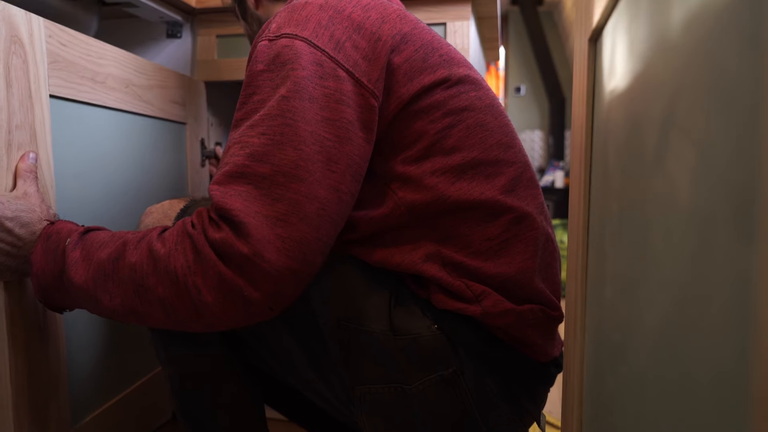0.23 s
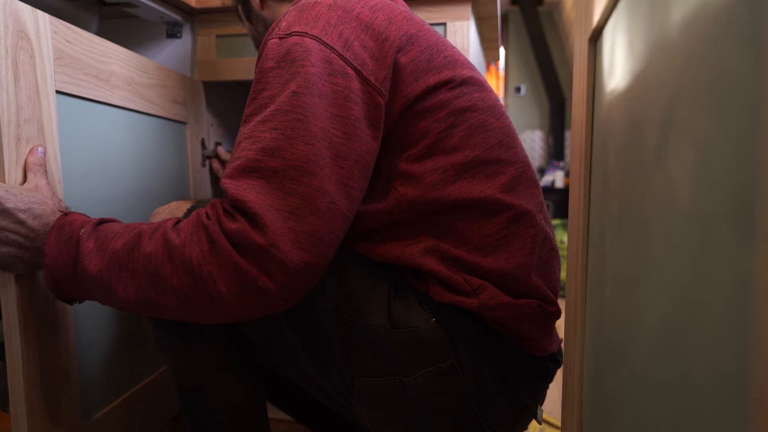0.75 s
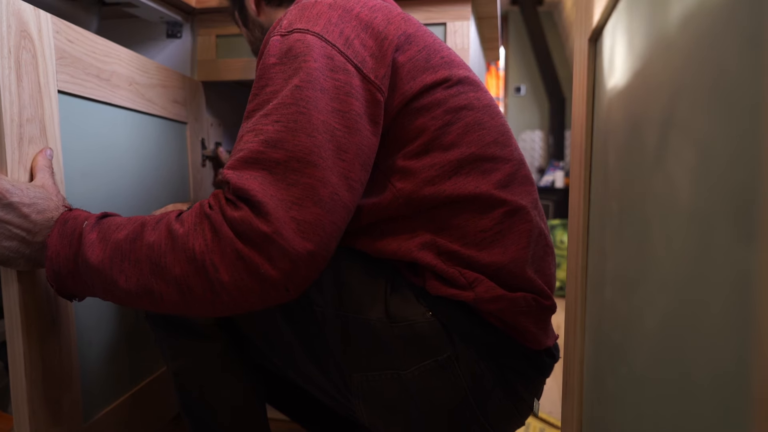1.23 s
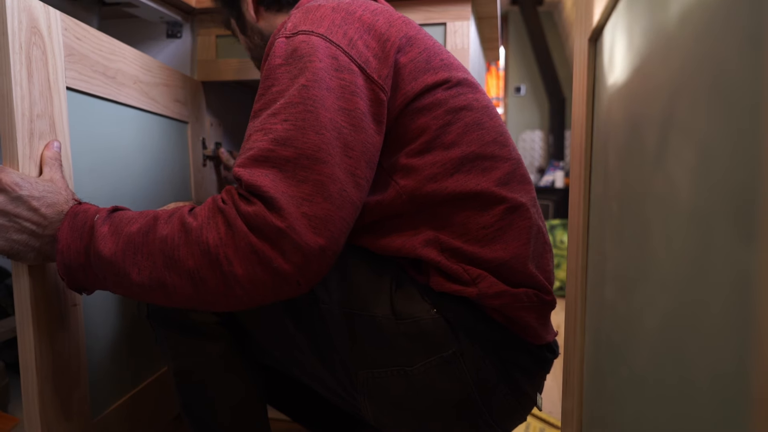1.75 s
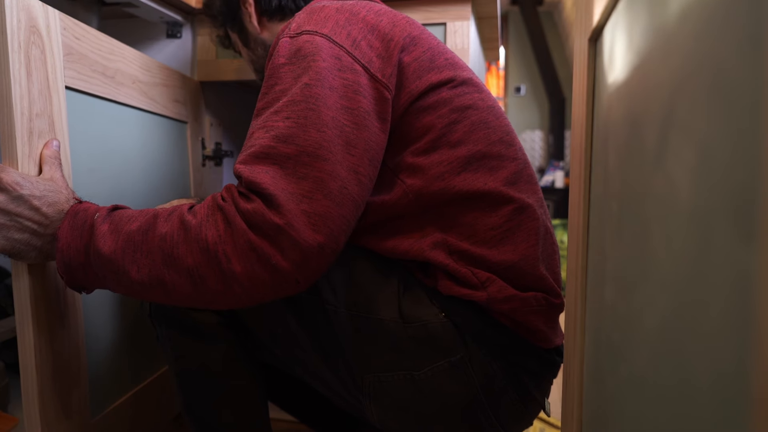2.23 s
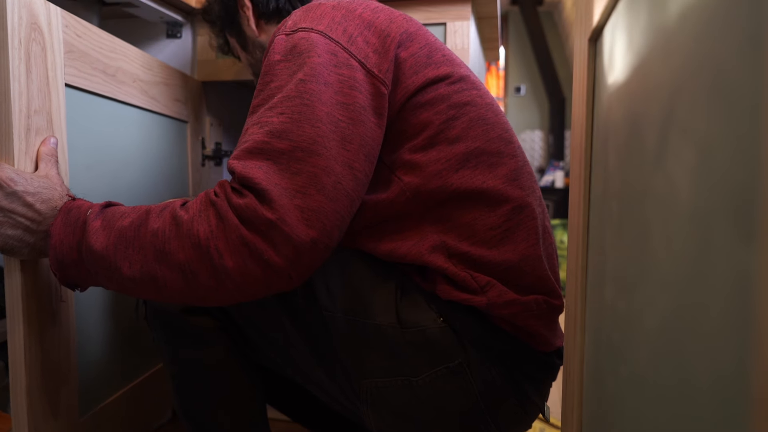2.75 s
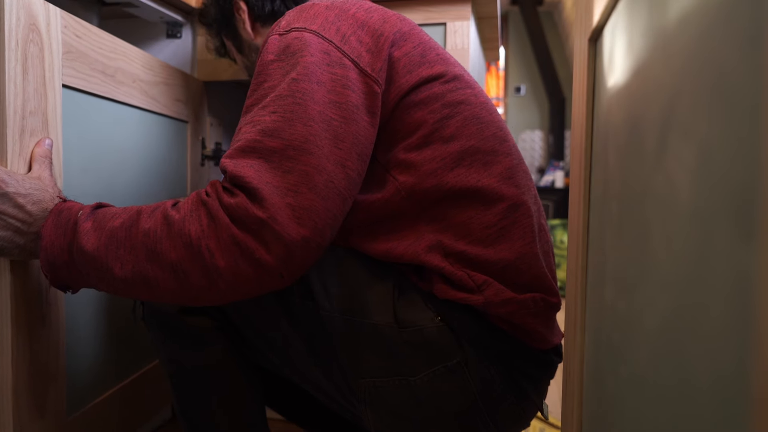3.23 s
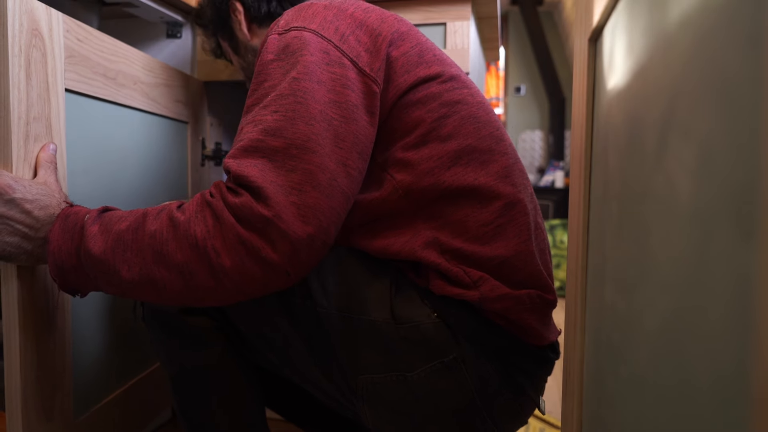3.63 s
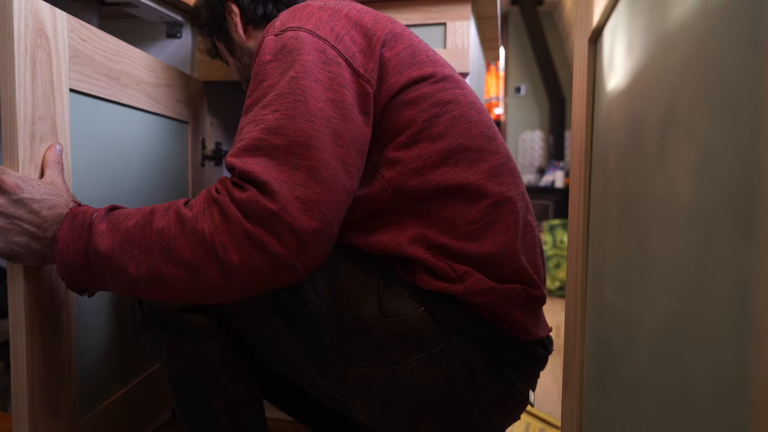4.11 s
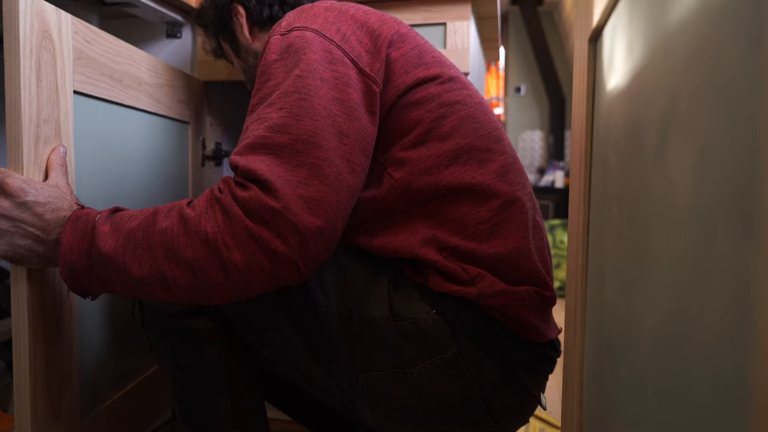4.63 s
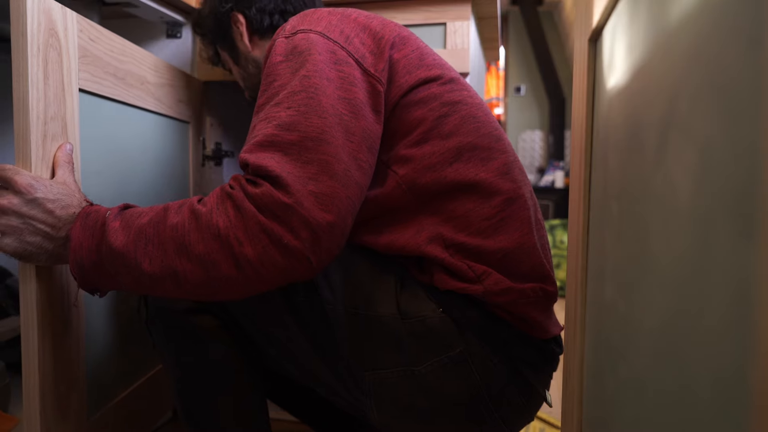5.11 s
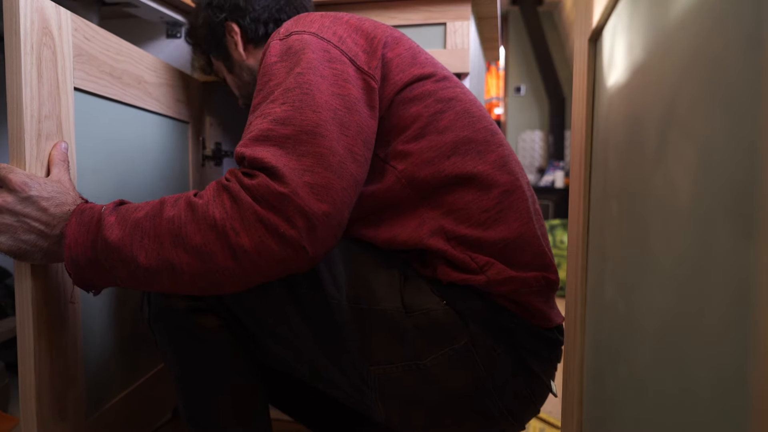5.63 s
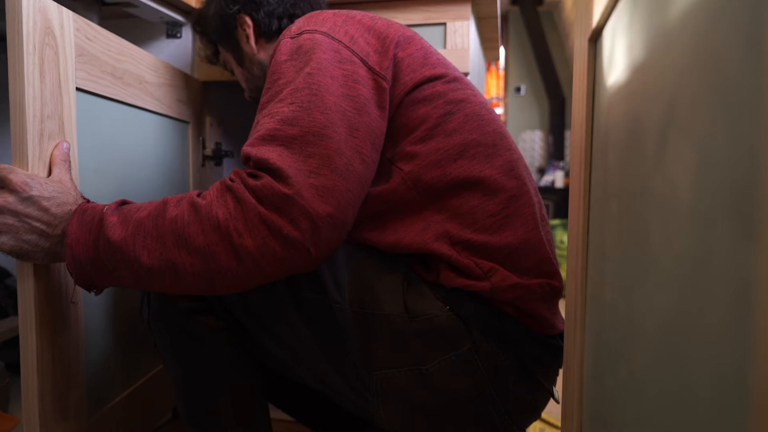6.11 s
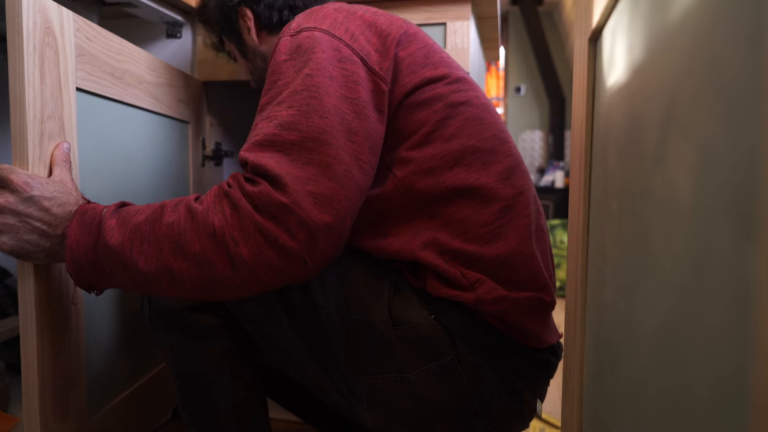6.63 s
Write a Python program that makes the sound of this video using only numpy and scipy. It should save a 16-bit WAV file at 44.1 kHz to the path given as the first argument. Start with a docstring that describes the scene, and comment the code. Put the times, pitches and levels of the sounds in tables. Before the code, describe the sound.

A small, quiet room with faint low air tone and a short woody reverberation, heard close. From 0.3 to 0.6 seconds a rapid cluster of hinge clacks and wooden knocks rattles, ending in a low thump. Near 1.2 there is a barely audible squeak, then tiny ticks and scuffs around 1.4. At 1.5 come the strongest hits: hard bright clacks over a deep hollow door bump, another heavy thud at 1.73, and a soft one at 2.0. A duller click and bump land at 2.5. Light fumbling taps run from 3.0, building to muffled double thumps at 3.45 and 3.65, with slight wood rubbing. It stays nearly quiet until a soft bump at 4.7, a clear knock at 5.0 and dull thuds at 5.3 to 5.4. A single crisp clack sounds at 6.34, then faint ticks, and a low rustling hiss abruptly enters at 6.8.

```python
"""In a small room, a wooden cabinet door is worked onto its hinges.
At each contact the hinge steel bites, the wood seats just after, and the door gets a small jolt: noise bursts
shaped as snap, clack and knock, over ringing stiles. Heavier bumps against the frame are low swelling sines with
a carcass boom and a humming panel, and leave the door trembling as low noise. Wood and sleeve rub as noise
strokes, the hinge ticks, scuffs and squeaks faintly, and at the end a rustling hiss cuts in."""
import sys
import numpy as np
from scipy import signal
from scipy.fft import rfft, irfft, next_fast_len
from scipy.io import wavfile
from scipy.ndimage import uniform_filter1d, map_coordinates

SR = 44100
rng = np.random.default_rng(int(sys.argv[2]) if len(sys.argv) > 2 else 0)


def unload_wav(signal):
    """Save mono or channel-first audio to the path in sys.argv[1] as 16-bit WAV at rate SR, clipped to [-1, 1]."""
    wavfile.write(
        sys.argv[1],
        SR,
        np.round(np.clip(np.atleast_2d(signal).T, -1, 1) * 32767).astype(np.int16),
    )


N = 302631
CLOCK = np.arange(N) / SR  # scene time in seconds
T = np.arange(round(0.8 * SR)) / SR  # time within one event, in seconds

# Table levels stand before the trims of the functions that play them.
# Hinge contacts. Each row: start in seconds, strength in dB, hardness (clack over knock) in dB,
# steel (snap over clack) in dB, contact length in ms.
CONTACTS = [(0.0, -55.5, -5, -12.5, 4), (0.3149, -45.5, 1, -27, 4.9), (.332, -38.5, 0.5, -19, 4.6),
            (.368, -35, 0, -16.5, 2.6), (0.383, -38, 4, -8, 3.3), (.474, -46, -2, -14, 2),
            (.504, -37, 0, -14, 1.84), (.527, -45.5, -6, -27, 2.6), (.651, -54, -0.5, -30, 1.7),
            (1.501, -40, 3, -14.5, 2), (1.526, -33, 2.5, -20.5, 2.4), (1.5452, -29.5, 2, -31.5, 1.4),
            (1.725, -40, -20.5, -6.5, 5), (1.745, -43.5, -2, -19, 1.5), (1.991, -64, -10, -18, 2.5),
            (2.521, -39, -6, -9, 3), (2.648, -52, -3, -14.5, 3.9), (2.769, -65, -13.5, -14, 3),
            (2.984, -52.5, -8.5, -11, 2), (3.1, -65.5, -6, -19.5, 4), (3.121, -57.5, -9.5, -25, 6),
            (3.275, -60.5, -8, -14, 2.14), (3.37, -68, -4, -10.5, 3.4), (3.437, -48.5, -3.5, -18.5, 3.6),
            (3.584, -52.5, -12.5, -15, 3.3), (3.623, -49.5, -17, -13, 6), (3.646, -43, -9.5, -25, 2.15),
            (3.658, -47.5, -5.5, -19.5, 2.51), (4.298, -59.5, -11, -3, 2.9), (4.412, -60, -7, -22, 2.5),
            (4.675, -63, -8, -11, 3), (4.828, -68.5, -6, -7, 3.4), (4.95, -64.5, -1.5, -21, 9.4),
            (5.0, -33, -6, -10.5, 2.8), (5.32, -40, -14.5, -15.5, 4.5), (5.346, -54, 1, -20, 3),
            (5.372, -52, -14, -1.5, 2), (5.408, -57.5, -13.5, -9, 2.1), (5.891, -74, -3, -10.5, 3),
            (6.342, -33, 7, -11.5, 3.3), (6.61, -68.5, -10.5, -6, 3.3), (6.731, -68.5, -5.5, 2.5, 1.4)]
# The door bumps the frame. Each row: start in seconds, level in dB, pitch in Hz, swell to the peak in ms,
# carcass boom and panel ring in dB over the bump.
BUMPS = [(0.319, -37.5, 110, 59, -16.5, 16.5), (0.37, -22.5, 126, 10.5, -11.5, -3),
         (.585, -16, 91, 10.6, -16.5, -38), (.759, -44, 93.6, 12, -12, -20),
         (1.421, -44.5, 66.6, 2.6, -7.5, 4), (1.507, -22, 97, 31, -16.5, -1.5),
         (1.544, -8, 88, 16, -11.5, -25), (1.735, -13, 103.8, 9.1, -12.5, -19.5),
         (2.005, -31, 97, 13.3, -10.5, -11), (2.561, -30, 101.7, 13.8, -16, -31.5),
         (3.176, -37.5, 96, 6.3, -32, -21.5), (3.226, -37, 96, 15, -18, -31),
         (3.441, -21.5, 86.7, 12, -15, -25.5), (3.648, -16.5, 96, 15, -15, -33.5),
         (3.669, -25.5, 100, 17, -22, -43), (4.678, -27, 110.6, 14.4, -14, -27),
         (4.755, -38.5, 105.4, 11.4, -22, -25), (5.02, -28.5, 90, 17.5, -12, -23.5),
         (5.324, -30, 86, 9.2, 0, -13.5), (5.362, -25, 95, 23.2, -9, -33.5),
         (5.432, -31.5, 101, 7.6, -33.5, -29)]
# The door is shifted. Each row: fastest moment of the slide in seconds, rise and fall in seconds,
# wood rub in dB, sleeve rub in dB.
SHIFTS = [(.322, 0.029, .03, -53.5, -84), (1.43, 0.19, 0.08, -66, -75), (3.191, 0.13, 0.11, -67.5, -92.5),
          (3.635, 0.032, .03, -53.5, -73.5), (4.07, 0.0676, .09, -71.5, -74.5),
          (4.3, 0.09, 0.06, -65.5, -75)]
# Spectrum of scraping hinge parts. Each row: frequency in Hz, relative level in dB per Hz.
SCRAPE = [(200, -22), (700, 4.5), (1600, 8.5), (3000, -6.5), (6000, -8), (12000, -13.5), (16000, -21.5)]


def amp(db):
    """Decibels to gain."""
    return 10 ** (np.asarray(db) / 20)


def unit(x):
    """Scale to rms 1."""
    return x / np.sqrt(np.mean(x ** 2) + 1e-20)


def along(points, hz):
    """Read (Hz, value) points on a log frequency axis."""
    point_hz, values = np.transpose(points)
    return np.interp(np.log(hz + 1), np.log(point_hz), values)


def flat(hz):
    """A band that passes everything."""
    return 1


def noise(spectrum, size, band=flat):
    """Coloured noise of rms 1: every frequency at a random phase."""
    m = next_fast_len(size, real=True)
    hz = np.fft.rfftfreq(m, 1 / SR)
    phases = np.exp(2j * np.pi * rng.random(len(hz)))
    return unit(irfft(amp(along(spectrum, hz)) * band(hz) * phases, m)[:size])


def wobble(rate):
    """A smooth random curve with `rate` knots a second."""
    knots = rng.standard_normal(int(N * rate / SR) + 4)
    return map_coordinates(knots, [CLOCK * rate], order=2)


def add(track, s, sound):
    """Mix a sound into the track at s seconds."""
    part = track[max(round(s * SR), 0):][:len(sound)]
    part += sound[:len(part)]


def ten_ms_energy(x):
    """Scale to the energy of 10 ms at rms 1."""
    return x * np.sqrt(0.01 * SR / np.sum(x ** 2))


def burst(spectrum, life, band=flat, rise=0.5):
    """Dense modes, heard as noise that swells, holds briefly and drops away."""
    t = T[:len(T) // 5]
    u = t / life
    envelope = u ** rise * np.exp(-(rise + 0.5) * u ** 1.7 / 1.7)
    return ten_ms_energy(envelope * noise(spectrum, len(t), band))


def ring(modes, attack):
    """Damped modes, struck at slightly new strengths each time."""
    t = T[:len(T) // 2]
    total = np.zeros(len(t))
    for hz, db, t60 in modes:
        decay = amp(db + 2 * rng.normal() - 60 * t / t60)
        total += decay * np.sin(2 * np.pi * (hz * t + rng.random()))
    return total * (1 - np.exp(-t / attack))


def stroke(s, rise, fall):
    """A slide that speeds up until s seconds and slows down again."""
    return np.exp(-((CLOCK - s) / np.where(CLOCK < s, rise, fall)) ** 2)


def in_room(sound, build=0.0017, blur_hz=320, fill=0.15):
    """The sound and a fresh diffuse tail; gathered from all sides, the tail evens out narrow notches."""
    # Decay of the room. Each row: frequency in Hz, t60 in seconds.
    room_t60 = [(90, 0.34), (300, 0.1841), (800, 0.3262), (2000, 0.357), (6000, 0.32), (14000, 0.8)]
    # Strength of the tail. Each row: frequency in Hz, level over the direct sound in dB.
    room_echo = [(90, -4), (300, -4.5), (800, -8.5), (2000, -10), (5000, -10.5), (12000, -20)]
    hz, t, grid = signal.stft(rng.standard_normal(len(T)), SR, nperseg=512)
    t60 = along(room_t60, hz)[:, None]
    tail = signal.istft(grid * amp(-60 * t / t60) / np.sqrt(t60), SR)[1][:len(T)]
    tail = tail * (1 - np.exp(-(T / build) ** 2))  # the echoes take `build` seconds to gather
    m = next_fast_len(len(T) + len(sound), real=True)
    direct = rfft(sound, m)
    sent = direct * amp(along(room_echo, np.fft.rfftfreq(m, 1 / SR)))
    power = np.abs(sent) ** 2
    even = np.abs(uniform_filter1d(power, 1 + int(blur_hz * m / SR))) + 1e-30
    wet = sent * np.sqrt(even / (power + fill * even)) * rfft(tail, m)
    wet = wet * np.linalg.norm(sent) / np.linalg.norm(wet)  # the tail carries exactly the energy sent
    return irfft(direct + wet, m)[:len(T)]


def background(air_db=-68, hiss_db=-42.5, hiss_start=6.796, rustle_db=2.5):
    """Still room air as steady noise, and a rustling hiss of uneven level that cuts in at hiss_start seconds."""
    # Spectrum of the still room. Each row: frequency in Hz, relative level in dB per Hz.
    air = [(12, -48), (20, -29.5), (77, 2), (172, -17), (210, -6.5), (347, -23.5), (388, -20), (422, -23.5),
           (718, -18), (923, -21), (1570, -27), (2600, -34), (8890, -39), (16000, -43)]
    # Spectrum of the hiss. Each row: frequency in Hz, relative level in dB per Hz.
    hiss_colour = [(24, -44), (40, -20), (101, -7), (209, -6.5), (320, -7), (585, -21.5), (751, -14.5),
                   (1340, -20.5), (2000, -24.5), (4570, -33.5), (5440, -22), (6020, -31.5), (7540, -31.5),
                   (16000, -45)]
    level = amp(hiss_db + rustle_db * wobble(200))
    hiss = (CLOCK > hiss_start) * level * noise(hiss_colour, N)
    return amp(air_db) * noise(air, N) + hiss


def squeak(start=1.2, length=0.051, from_hz=4050, to_hz=3850, db=-77):
    """The hinge pin gives one faint, broken squeak: a sliding sine of unsteady pitch and level."""
    u = np.clip((CLOCK - start) / length, 0, 1)
    pitch = from_hz + (to_hz - from_hz) * u + 90 * wobble(900)
    level = amp(db + 5.1 * wobble(120)) * np.sqrt(u * (1 - u)) * 2
    return level * np.sin(2 * np.pi * np.cumsum(pitch) / SR)


def ticks(trim_db=-5, life=0.00098):
    """Tiny ticks and creaks of the hinge, each a brief narrow ring."""
    # Each row: start in seconds, level in dB, pitch in Hz, bandwidth as a share of the pitch.
    tick_rows = [(1.232, -53.5, 780, 0.22), (1.243, -55, 3100, .37), (1.388, -55, 4470, .54),
                 (1.426, -43, 3400, .14), (1.44, -43, 3150, 0.091), (3.57, -55, 8940, 0.19),
                 (6.7226, -60, 9060, .22)]
    out, t = np.zeros(N), T[:len(T) // 20]
    envelope = t / life * np.exp(1 - t / life)
    for s, db, pitch, width in tick_rows:
        grain = noise(SCRAPE, len(t), lambda hz: np.exp(-((hz / pitch - 1) / width) ** 2) + 0.078)
        add(out, s, amp(db + trim_db) * grain * envelope)
    return out


def rubbing(cloth_trim_db=-2, grain_db=2):
    """Wood and sleeve cloth slide with an uneven grip; the hinge arm scuffs its plate."""
    # Scuffs. Each row: fastest moment in seconds, level in dB, rise and fall time in seconds.
    scuff_rows = [(1.412, -61.5, 0.0076), (1.432, -60, 0.019), (1.486, -57, 0.011), (2.131, -55, 0.0091)]
    # Spectrum of rubbing wood. Each row: frequency in Hz, relative level in dB per Hz.
    rub = [(150, -12), (400, 16), (800, 15), (1700, 7), (3500, -11), (8000, -43)]
    # Spectrum of rubbing cloth. Each row: frequency in Hz, relative level in dB per Hz.
    cloth_colour = [(1000, -15), (3000, 5), (6000, -10.5), (10000, -11), (16000, -10.5)]
    wood = sum(amp(db) * stroke(s, rise, fall) for s, rise, fall, db, _ in SHIFTS)
    cloth = sum(amp(db + cloth_trim_db) * stroke(s, rise, fall) for s, rise, fall, _, db in SHIFTS)
    scuffs = sum(amp(db) * stroke(s, length, length) for s, db, length in scuff_rows)
    slides = wood * noise(rub, N) + cloth * noise(cloth_colour, N) + scuffs * noise(SCRAPE, N)
    return slides * amp(grain_db * wobble(140))


def tremble(onset=0.015, sway_db=2):
    """The held door rumbles: faintly always, more while it is shifted, most after a bump."""
    # Spectrum of the trembling door. Each row: frequency in Hz, relative level in dB per Hz.
    rumble = [(30, -9.5), (70, -4), (112, -2.5), (200, -17), (300, -10), (450, -31.5), (2000, -67)]
    hold_db, shift_db = -68.5, 7.5  # door merely held; a shift, over its wood rub
    bump_db, grows, fade = -33.5, 0.82, 76.5  # left by a 0 dB bump, dB per dB of bump, fade in dB per second
    power = amp(hold_db) ** 2
    for s, rise, fall, db, _ in SHIFTS:
        power = power + (amp(db + shift_db) * stroke(s, rise, fall)) ** 2
    for s, db, *_ in BUMPS:
        age = np.maximum(CLOCK - s, 0)
        level = amp(bump_db + grows * db - fade * age) * np.minimum(age / onset, 1)
        power = power + level ** 2
    return np.sqrt(power) * amp(sway_db * wobble(17)) * noise(rumble, N)


def bumps(thump_trim_db=-1.5, carcass_trim_db=-2, panel_trim_db=-2, softness=3.7, boom_life=0.026, panel_rise=0.69):
    """Bumped or jolted, the whole door swings for a few cycles; the carcass booms and the panel hums after."""
    # Hollow boom of the carcass. Each row: frequency in Hz, relative level in dB per Hz.
    carcass_colour = [(80, -35), (140, -5), (205, 2.5), (228, -11), (255, 1), (315, -3.5), (370, -13.5),
                      (600, -22.5), (1200, -66)]
    # Modes of the door's panel. Each row: frequency in Hz, level in dB, t60 in seconds.
    panel_modes = [(296.1, 4, 0.28), (283.1, -5, 0.091), (394, -16.5, 0.27), (471, -16.5, .18)]
    jolt_db, jolt_grows = -9, 0.61  # jolt of a 0 dB contact, dB per dB of contact
    jolt_rest = (105, 9, -7.5, -18)  # pitch in Hz, swell in ms, carcass and panel in dB, as in BUMPS
    jolts = [(s, jolt_db + jolt_grows * db, *jolt_rest) for s, db, *_ in CONTACTS]
    out, t = np.zeros(N), T[:len(T) // 2]
    for s, db, hz, ms, carcass, panel in BUMPS + jolts:
        swell = ms / 1000
        envelope = (t / swell * np.exp(1 - t / swell)) ** softness
        hit = amp(thump_trim_db) * envelope * np.sin(2 * np.pi * hz * t)
        add(hit, 0, amp(carcass + carcass_trim_db) * burst(carcass_colour, boom_life, rise=0.86))
        add(out, s, in_room(amp(db) * hit, build=0.0063, blur_hz=0))
        add(out, s, amp(db + panel + panel_trim_db) * ring(panel_modes, attack=panel_rise * swell))
    return out


def blows(count=2):
    """Every contact, and stray hinge taps in each shift, as two blows: the bite, then the wood's duller seating."""
    stray_db, stray_hard, stray_steel, stray_ms = -2.5, -7, -13.5, 1.6  # level over the wood rub, then as CONTACTS
    seat_lengths, seat_ms = 1.8, 3.5  # delay in contact lengths, length of the seating in ms
    seat_db, seat_hard = -3.5, -7.5  # change of strength and of hardness from the bite, in dB
    taps = []
    for s, rise, fall, db, _ in SHIFTS:
        for u in rng.uniform(-1, 1, count):
            moment = s + u * (rise if u < 0 else fall)
            taps.append((moment, db + stray_db, stray_hard, stray_steel, stray_ms))
    bites = CONTACTS + taps
    seats = [(s + seat_lengths * ms / 1000, db + seat_db, hard + seat_hard, steel, seat_ms)
             for s, db, hard, steel, ms in bites]
    return bites + seats


def pock(hz, life):
    """A few cycles of the wood's own pitch at the struck spot."""
    t = T[:len(T) // 5]
    envelope = (t / life) ** 2 * np.exp(-(t / life) ** 2)
    return ten_ms_energy(envelope * np.sin(2 * np.pi * (hz * t + rng.random())))


def chatter(hit, count=3, first_db=-15, gap=0.009):
    """Loose parts touch again a few times, at uneven gaps and ever more weakly."""
    out = np.pad(hit, (0, len(T) // 10))
    for k, s in enumerate(np.cumsum(gap * rng.uniform(0.43, 1.5, count))):
        add(out, s, amp(first_db - k) * hit)
    return out


def contacts(low_hz=1200, high_hz=3200, hand_db_per_s=170):
    """Each blow sets off dense modes: the high ones peak and die first, the stiles ring on under the holding hand.

    A harder blow has a brighter clack, with a resonance near the top of its band; a stronger one pocks more."""
    # Spectrum of the struck wood. Each row: frequency in Hz, relative level in dB per Hz.
    wood = [(200, -12.5), (450, -3.5), (600, 4), (760, -7), (1100, 4), (1600, 16.5), (2600, 1), (3200, -9),
            (4000, -16.5), (5200, -20), (6400, -23), (8000, -29.5), (12000, -35.5), (16000, -36.5)]
    # Modes of the wooden stiles. Each row: frequency in Hz, level in dB, t60 in seconds before the hand's damping.
    stiles = [(543, -7, .2), (662, 13, 0.13), (753, 0.5, 1), (842, -5, .18), (1070, -5, .18), (1185, 7, .2),
              (1397, 5.5, 0.15), (1650, -3.5, 0.05), (1930, -7, .16), (2260, -13.5, .17)]
    knock_db, clack_db, snap_db, stile_db = -1, 1, 1, -16  # trims
    pock_db, pock_grows = 6, 1.221  # pock of a 0 dB blow, dB per dB of blow
    knock_life, clack_life, snap_life, pock_life = 1.5, 1.5, 1.0, 1.1  # in contact lengths
    tilt, tilt_per_db = 0.2, 0.17  # clack brightness as a power of frequency, and its growth per dB of hardness
    edge_db, edge_hz, edge_width_hz = 5, 2550, 280  # resonance near the top of the clack

    def below(hz, limit):
        return 1 / np.sqrt(1 + (hz / limit) ** 20)

    def above(hz, limit):
        return np.sqrt(1 - below(hz, limit) ** 2)

    def edge(hz):
        return amp(edge_db * np.exp(-((hz - edge_hz) / edge_width_hz) ** 2))

    out = np.zeros(N)
    held = amp(-hand_db_per_s * T[:len(T) // 2])
    for s, db, hard, steel, ms in blows():
        pitch = 785 + 5 * hard  # Hz; harder wood sounds higher
        length = ms / 1000
        rise = 0.12 + ms / 10  # a long contact also builds up gently

        def knock_band(hz):
            return below(hz, low_hz) / np.hypot(1, 2 * (hz / pitch - pitch / (hz + 1)))

        def clack_band(hz):
            slope = np.maximum(hz / low_hz, 1) ** (tilt + tilt_per_db * hard)
            return above(hz, low_hz) * below(hz, high_hz) * slope * edge(hz)

        def snap_band(hz):
            return above(hz, high_hz)

        hit = amp(db + knock_db) * burst(wood, knock_life * length, knock_band, 2 * rise)
        hit += amp(db + hard + clack_db) * burst(wood, clack_life * length, clack_band, rise)
        hit += amp(db + hard + steel + snap_db) * burst(wood, snap_life * length, snap_band, rise / 2)
        hit += amp(pock_db + pock_grows * db) * pock(pitch, pock_life * length)
        add(out, s, in_room(chatter(hit)))
        add(out, s, amp(db + stile_db) * held * ring(stiles, attack=length))
    return out


def scene():
    """Everything at one microphone."""
    faint = background() + squeak() + ticks() + rubbing()
    return (faint + tremble() + bumps() + contacts())[None]


def record(dry, bass_hz=45, top_hz=15900):
    """The microphone thins the deepest bass, and nothing is kept above the band limit."""
    thin = signal.sosfilt(signal.butter(2, bass_hz, "highpass", fs=SR, output="sos"), dry)
    m = next_fast_len(N + SR // 2)
    kept = np.fft.rfftfreq(m, 1 / SR) < top_hz
    return irfft(rfft(thin, m) * kept, m)[..., :N]


dry = scene()
out = record(dry)
unload_wav(out)
```